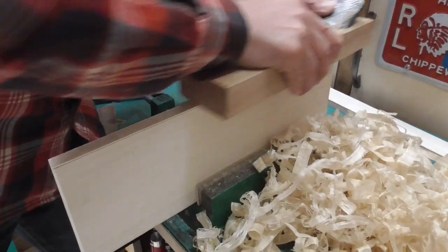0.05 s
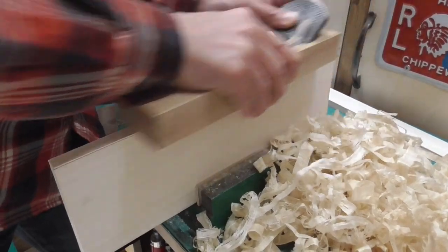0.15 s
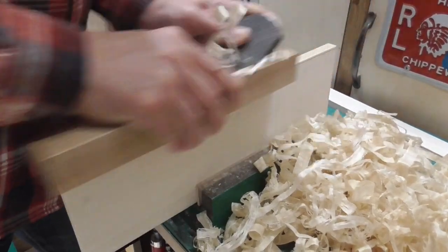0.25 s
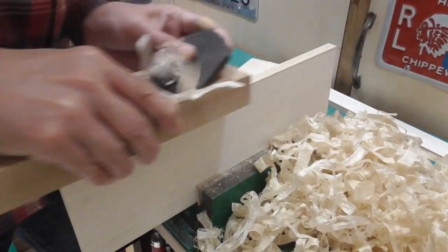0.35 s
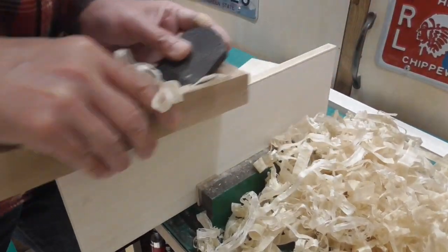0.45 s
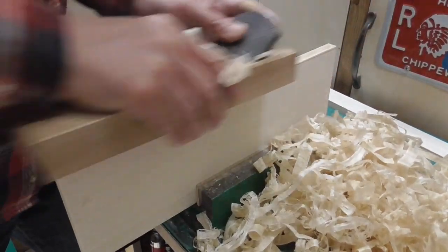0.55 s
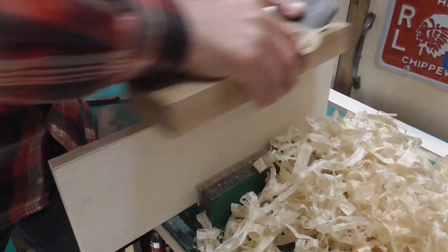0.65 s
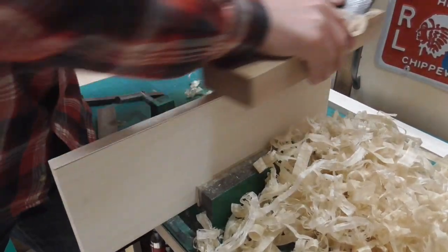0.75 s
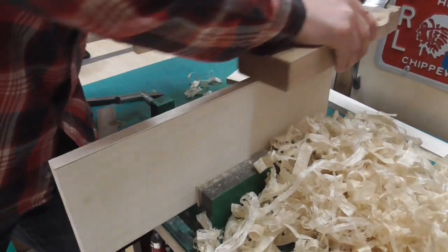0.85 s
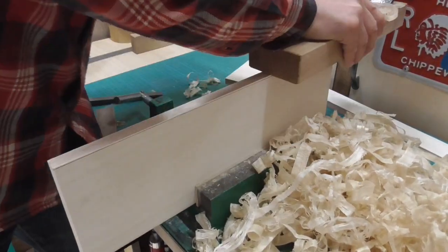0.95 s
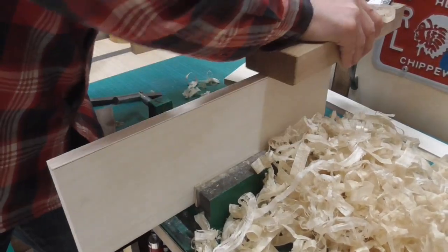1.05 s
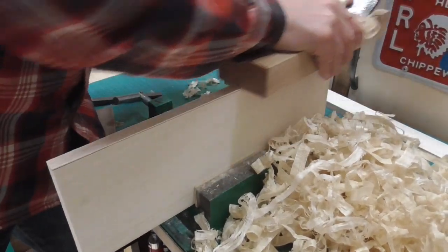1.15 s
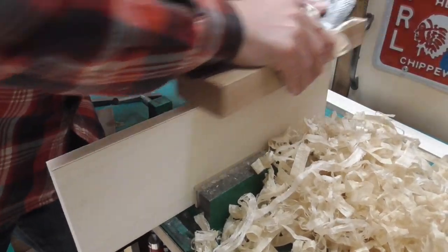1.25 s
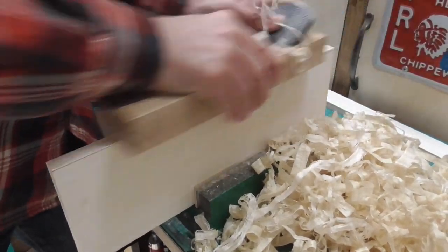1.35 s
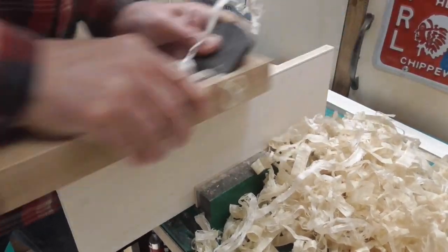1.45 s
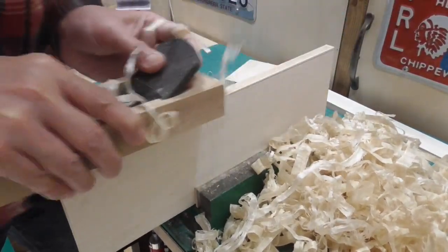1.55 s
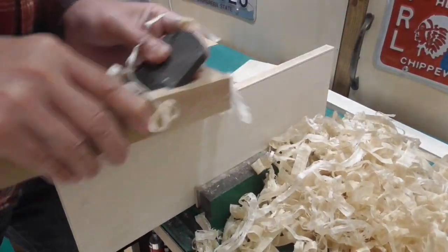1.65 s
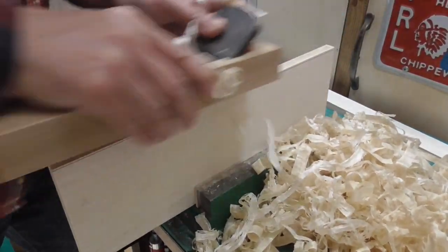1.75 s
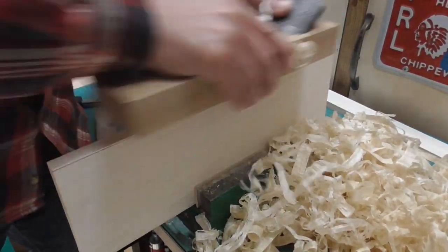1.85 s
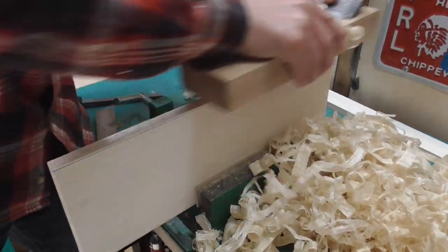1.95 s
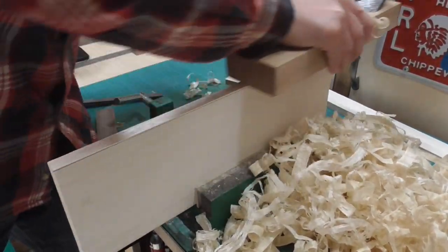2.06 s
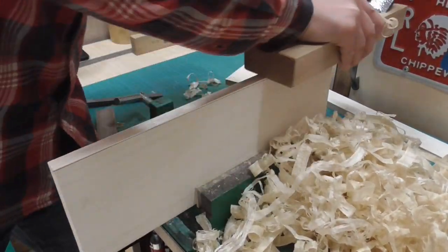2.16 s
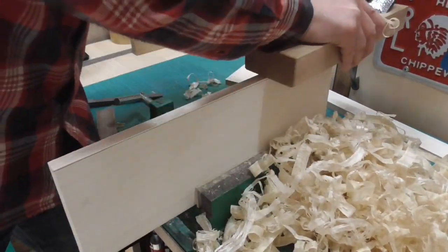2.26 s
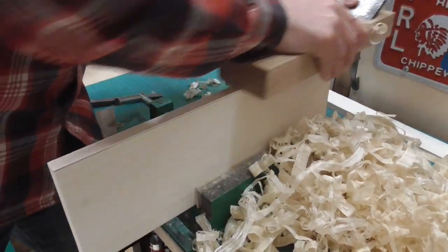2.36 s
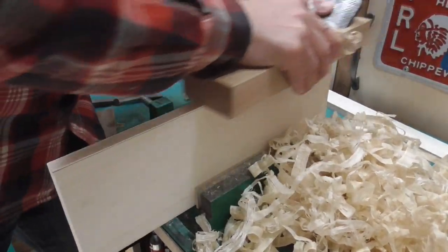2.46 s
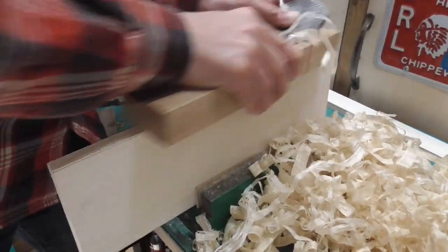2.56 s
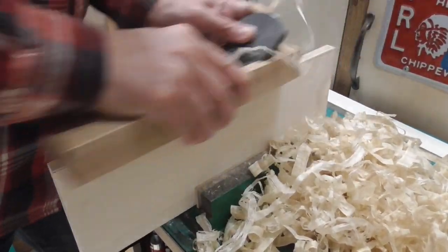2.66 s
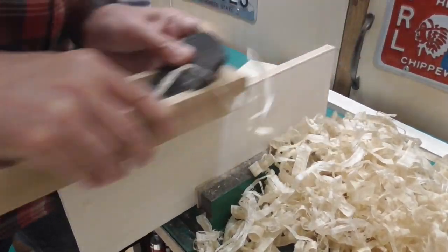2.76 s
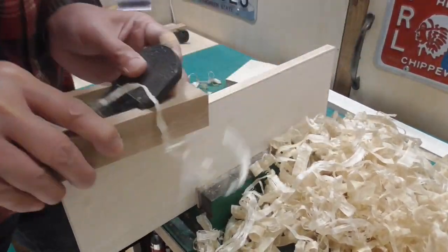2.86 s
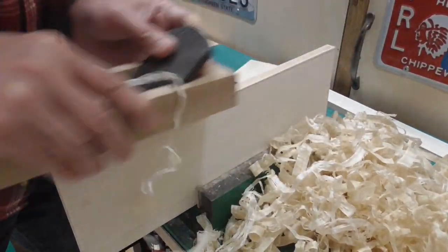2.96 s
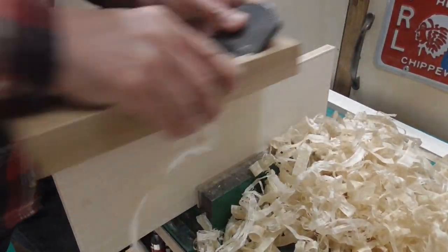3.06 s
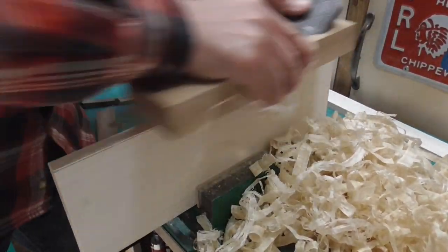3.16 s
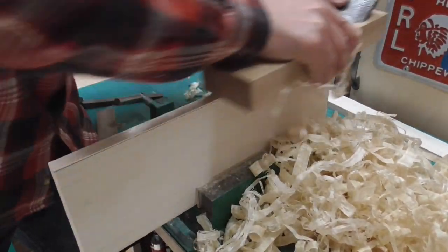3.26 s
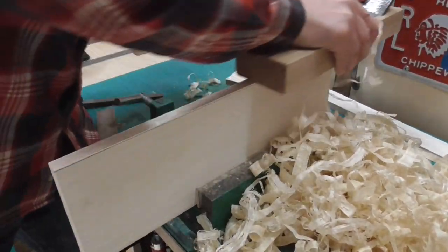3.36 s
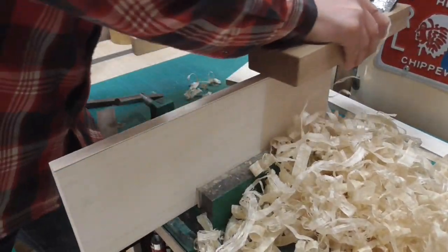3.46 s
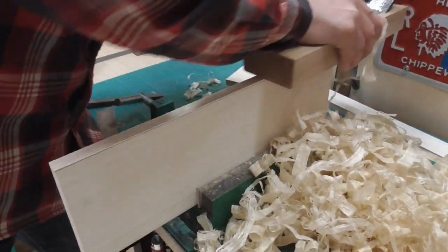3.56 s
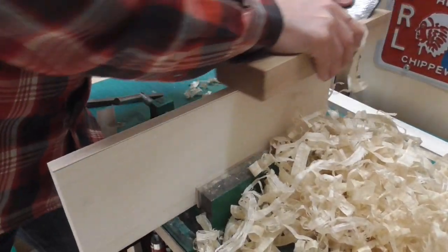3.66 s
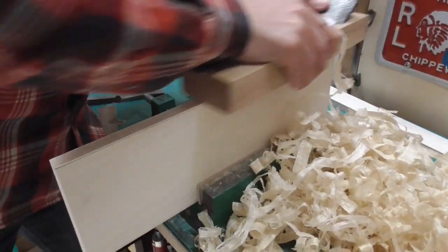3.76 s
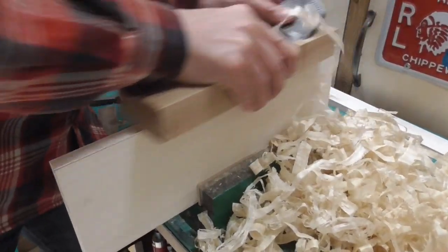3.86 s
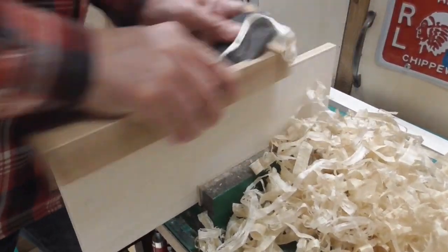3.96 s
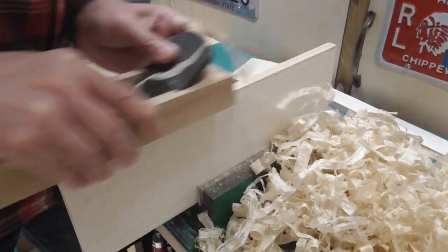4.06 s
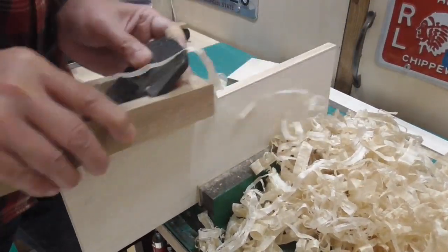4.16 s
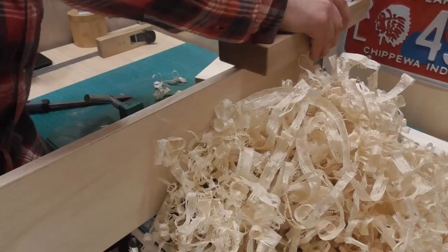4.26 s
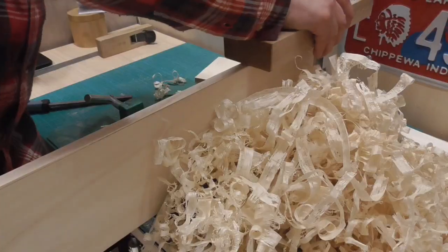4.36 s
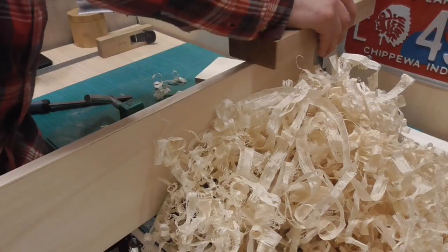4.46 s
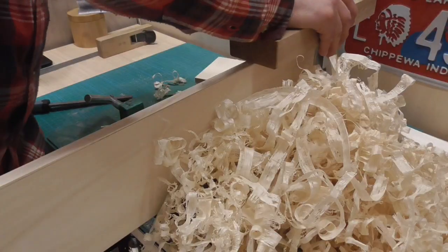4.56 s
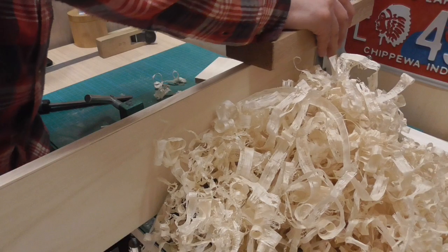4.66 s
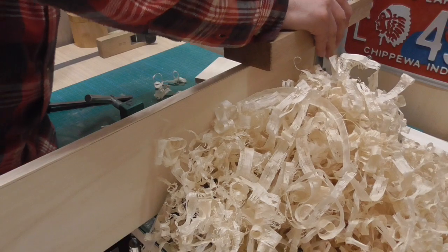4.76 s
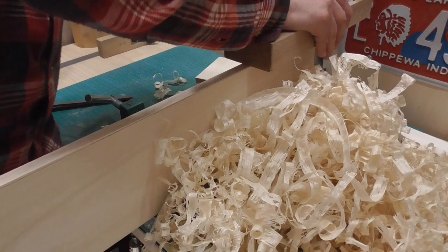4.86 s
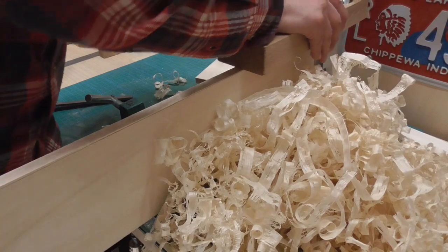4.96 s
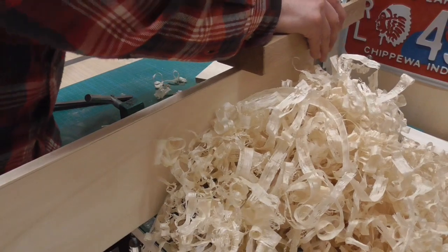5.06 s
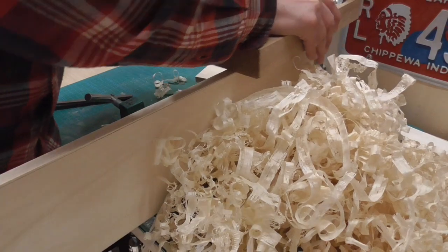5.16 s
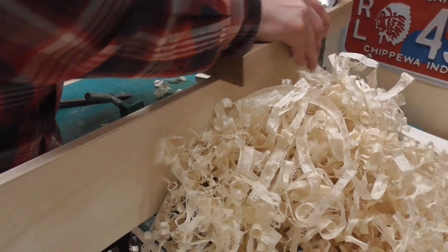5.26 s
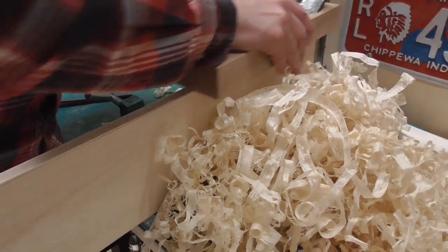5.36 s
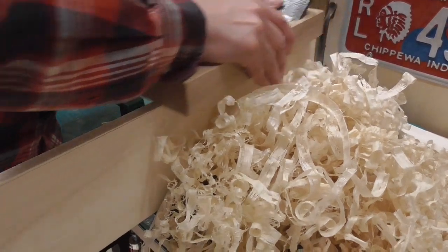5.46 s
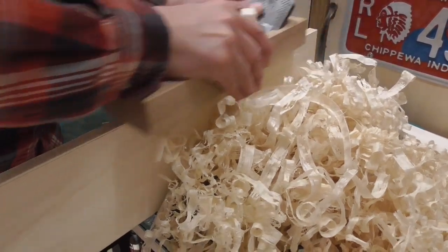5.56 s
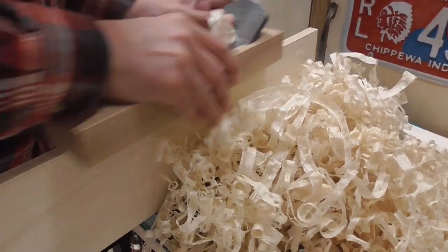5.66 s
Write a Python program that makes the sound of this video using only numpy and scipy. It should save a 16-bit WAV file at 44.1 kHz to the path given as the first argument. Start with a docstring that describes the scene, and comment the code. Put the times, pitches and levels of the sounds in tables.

```python
"""A tearing rasp with a bright hiss and short squeals: a hand plane's iron is already cutting the edge of a board.
The plane comes back with a rustle of shavings, knocks down, rubs along on its sole and bites again.
Four strokes on one board, then a slower one on a second board, in a small quiet workshop.
Cutting is clumped random clicks (breaking fibres) through resonances of board, plane and iron, plus rough
noise tones for tearing and squealing; knocks are bouncing pulses that ring the same boards."""
import sys
import numpy as np
from scipy import signal
from scipy.fft import rfft, irfft, next_fast_len
from scipy.io import wavfile

SR = 44100
rng = np.random.default_rng(int(sys.argv[2]) if len(sys.argv) > 2 else 0)


def log_audio(samples):
    """Write samples as a 16-bit WAV file to the path given in sys.argv[1]."""
    # one column per channel
    frames = np.atleast_2d(samples).T
    # limit to full scale, then quantise
    limited = np.clip(frames, -1, 1)
    pcm = np.round(limited * 32767).astype(np.int16)
    wavfile.write(sys.argv[1], SR, pcm)


N = 251370
TIME = np.arange(N) / SR
# Levels in all tables are relative: each layer's own trims are added on top.


def from_db(db):
    """Decibels to an amplitude factor."""
    return 10 ** (np.asarray(db) / 20)


def rms_one(x):
    """Scale to an rms of 1."""
    return x / np.sqrt(np.mean(x ** 2) + 1e-20)


def stereo(mid, side, width):
    """Left and right share the middle and take the side with opposite signs."""
    return mid + width * side * np.array([[1], [-1]])


def progress(start, end):
    """Share of a movement done, 0 to 1."""
    return np.clip((TIME - start) / (end - start), 0, 1)


def envelope(start, end, attack_s, release_db_per_s):
    """Rises to 1, holds until the end, then dies away."""
    attack = np.clip((TIME - start) / attack_s, 0, 1)
    return attack * from_db(-release_db_per_s * np.maximum(TIME - end, 0))


def drift(rate):
    """Random wander of rms 1: noise smoothed twice at the given rate [Hz]."""
    # made at a tenth of the sample rate; the first 4000 steps let the smoother settle
    r = np.exp(-20 * np.pi * rate / SR)
    noise = rng.standard_normal(N // 10 + 4002)
    slow = signal.lfilter([1], [1, -2 * r, r * r], noise)[4000:]
    return np.interp(np.arange(N) / 10, np.arange(len(slow)), rms_one(slow))


def colour(x, spectrum, size=4096):
    """Causal (minimum-phase) filter that follows a spectrum, interpolated over log frequency."""
    hz, db = np.transpose(spectrum)
    grid = np.maximum(np.arange(size // 2 + 1) * SR / size, 1)
    cepstrum = irfft(np.log(from_db(np.interp(np.log(grid), np.log(hz), db))))
    # folding the cepstrum forward in time gives minimum phase
    cepstrum[1:size // 2] *= 2
    cepstrum[size // 2 + 1:] = 0
    response = irfft(np.exp(rfft(cepstrum)))
    return signal.fftconvolve(np.atleast_2d(x), response[None], axes=1)[:, :N]


def resonate(x, modes, wander_db=0):
    """Parallel resonances; with a wander, each swells and fades as the contact point travels."""
    out = 0
    for hz, width, db in modes:
        r = np.exp(-np.pi * width / SR)
        poles = [1, -2 * r * np.cos(2 * np.pi * hz / SR), r * r]
        gain = from_db(db + wander_db * drift(3.5)) if wander_db else from_db(db)
        out = out + gain * (1 - r * r) / 2 * signal.lfilter([1, 0, -1], poles, x + 1e-18)
    return out


def fibres(per_s, spread_db, clump_db, width):
    """Fibres catch and break as clicks of uneven size, in clumps; width is the part unlike in the two ears."""
    sizes = from_db(spread_db * np.minimum(rng.exponential(1, (2, N)), 4))
    sizes = sizes * rng.choice([-1, 1], (2, N))
    mid, side = sizes * (rng.random((2, N)) < per_s / SR)
    return rms_one(stereo(mid, side, width) * from_db(clump_db * drift(92)))


def rough_tone(hz, half_width_hz, width):
    """A band of noise, rms 1, centred on a moving pitch."""
    turn = np.exp(2j * np.pi * np.cumsum(hz) / SR)
    smoother = signal.butter(2, half_width_hz, fs=SR, output="sos")
    real, imag = signal.sosfilt(smoother, rng.standard_normal((2, 2, N)))
    mid, side = np.real((real + 1j * imag) * turn)
    return rms_one(stereo(mid, side, width))


# Background spectrum of the shop: (frequency [Hz], level [dB])
ROOM_SPECTRUM = [(15, -33), (25, -26.5), (86, -8.5), (146, -9.5), (558, -12), (673, -9.5), (811, -14),
                 (1460, -16.5), (1910, -26), (2070, -21), (2430, -24.5), (5420, -28.5), (5880, -29),
                 (12400, -25), (15000, -31.5)]
ROOM_TONE_DB = -57.5


def room_tone(width=0.64, waver_db=1.5):
    """The quiet, dull background of the shop: coloured noise with a slowly wavering level."""
    mid, side = rng.standard_normal((2, N))
    noise = rms_one(colour(stereo(mid, side, width), ROOM_SPECTRUM))
    return from_db(ROOM_TONE_DB + waver_db * drift(4.9)) * noise


# Strokes of the cutting iron: (bite time [s], exit time [s], attack [s], board level [dB], rasp level [dB],
# hiss level [dB], fade [dB/s], late swell [dB], tearing pitch [Hz], squeal pitch [Hz])
CUT_STROKES = [(0.0, 0.41, 0.022, -28.5, -27.5, -37, 12.5, 7.5, 3200, 4500),
               (1.227, 1.612, 0.016, -28.5, -28, -33, 8, 7.5, 3350, 4557),
               (2.422, 2.885, 0.022, -28.5, -29.5, -32.5, 9, 5.5, 3400, 4500),
               (3.697, 4.125, 0.0092, -29.5, -31.5, -34.5, 8.5, 5, 3150, 4430),
               (5.205, 5.9, 0.073, -33.5, -31.5, -41.5, -5.5, 5, 2950, 4020)]
# Harder grain where the iron bites louder: (time [s], half length [s], level [dB])
HARD_GRAIN_SPOTS = [(0.407, 0.022, 1), (1.273, 0.034, 0.5), (2.49, 0.11, 2.5), (3.768, 0.06, 4.5),
                    (5.247, 0.05, 6), (5.33, 0.03, 4)]
BITE_S = 0.075  # time scale of the iron's first surge
FASTEST_AT, FAST_SPAN = 0.74, 0.31  # where and how broadly the plane runs fastest, as shares of the stroke


def cut_gain(axis, bite_db, swell_share, grain_share, release_db_per_s):
    """Gain of one level column: a surge at the bite, a steady fade or growth, a speed swell, hard grain."""
    gain = 0
    for row in CUT_STROKES:
        bite, end, attack_s, _, _, _, fade, swell_db, _, _ = row
        done = progress(bite, end)
        age = done * (end - bite)
        db = row[axis] + bite_db * np.exp(-(age / BITE_S) ** 2) - fade * age
        db = db + swell_share * swell_db * np.exp(-((done - FASTEST_AT) / FAST_SPAN) ** 2)
        gain = gain + from_db(db) * envelope(bite, end, attack_s, release_db_per_s)
    hardness_db = sum(db * np.sin(np.pi * progress(s - half, s + half)) ** 2
                      for s, half, db in HARD_GRAIN_SPOTS)
    return gain * from_db(grain_share * hardness_db)


def cut_pitch(axis):
    """One pitch column of the cuts, held through each stroke and gliding between strokes."""
    times = [s for row in CUT_STROKES for s in row[:2]]
    return np.interp(TIME, times, np.repeat([row[axis] for row in CUT_STROKES], 2))


# The sole slides without cutting: (start time [s], end time [s], level [dB], rise over the slide [dB],
# hiss level above the rub [dB])
SOLE_SLIDES = [(0.894, 1.05, -45, -1, -1.5), (1.106, 1.215, -51, 16.5, 1), (2.148, 2.266, -46.5, -1, -5.5),
               (2.321, 2.42, -51.5, 14.5, -1.5), (3.375, 3.544, -47, 3, 1), (3.591, 3.683, -51.5, 15.5, 0),
               (4.139, 4.211, -41.5, -10.5, 3.5), (4.227, 4.528, -49.5, 1, -4),
               (4.644, 4.791, -44, -6.5, -4), (4.903, 5.022, -53, 9.5, 0.5), (5.078, 5.234, -43, 8, -4.5)]


def slide_gain(bright=False, arch_db=1.5, attack_s=0.027, release_db_per_s=380):
    """Gain of the sole's rub, or of its hiss: it follows the speed of the push, arched over a rise or fall."""
    gain = 0
    for start, end, db, rise_db, hiss_db in SOLE_SLIDES:
        done = progress(start, end)
        speed_db = rise_db * done + arch_db * (np.sin(np.pi * done) - .5)
        level = from_db(db + speed_db + bright * hiss_db)
        gain = gain + level * envelope(start, end, attack_s, release_db_per_s)
    return gain


# Modes of each board with the plane on it: (frequency [Hz], width [Hz], level [dB])
FIRST_BOARD_MODES = [(146.6, 7.7, -1), (174.7, 8.3, 1), (218.7, 46, -0.5), (245, 9, -14), (357, 28, -10),
                     (399, 17.7, -7.5), (450.4, 46, -6), (488.5, 7, -24.5), (606.6, 29.8, 1.5),
                     (660, 34, -14.5), (688.7, 32, -3.5), (824.3, 17, -1.5), (980, 70, -47),
                     (1097, 79, -9.5), (1268, 50, -9.5), (1364, 33.6, -3), (1580, 43, -13.5),
                     (2060, 110, -4), (2428, 135, 4), (2732, 65, 1), (3360, 83, 9), (3730, 270, 2),
                     (4180, 160, -2), (4540, 184, 6.5)]
SECOND_BOARD_MODES = [(71.6, 20, -19), (114, 70, -3.5), (171, 6.9, 4.5), (225, 15, 3), (344.6, 14.4, -1),
                      (401, 38, 0.5), (459, 7.9, -5.5), (592, 39, -10), (723, 24.3, -4), (820, 75, -8),
                      (958, 15, 0), (1180, 190, -24), (1554, 37, -9.5), (2068, 31, 8.5), (2390, 220, 2.5),
                      (2820, 290, -1.5), (3200, 280, 7), (3670, 145, 9), (3870, 78, 15.5), (4400, 200, -27)]
BOARD_CHANGE_S, BOARD_TOP_HZ = 4.21, 1800


def low(modes):
    """The bending modes of the board."""
    return [m for m in modes if m[0] < BOARD_TOP_HZ]


def high(modes):
    """The upper modes, mostly of the plane's body."""
    return [m for m in modes if m[0] >= BOARD_TOP_HZ]


def boards(force, part):
    """A blow goes into the low or high modes of whichever board is in the vice."""
    first = TIME < BOARD_CHANGE_S
    first_ring = resonate(force * first, part(FIRST_BOARD_MODES))
    return first_ring + resonate(force * ~first, part(SECOND_BOARD_MODES))


def per_board(first, second):
    """Steady sound, each version scaled to rms 1, from whichever board is in the vice."""
    return np.where(TIME < BOARD_CHANGE_S, rms_one(first), rms_one(second))


# Spectrum of the rubbing force: (frequency [Hz], level [dB])
RUB_SPECTRUM = [(30, -31.5), (130, -11), (220, -7), (420, -8.5), (600, 1.5), (1000, -1), (1400, 2),
                (1900, -9.5), (3000, -1), (6000, -25)]


def board_drone(cut_db=0.0, slide_db=1.5, wander_db=1.8, direct_db=-19):
    """Cutting and sliding both shake the board's modes."""
    force = colour(fibres(per_s=5000, spread_db=2.0, clump_db=1.5, width=0.1), RUB_SPECTRUM)
    direct = from_db(direct_db) * force
    first = resonate(force, low(FIRST_BOARD_MODES), wander_db) + direct
    second = resonate(force, low(SECOND_BOARD_MODES), wander_db) + direct
    cut = cut_gain(axis=3, bite_db=-4.0, swell_share=-0.3, grain_share=1.0, release_db_per_s=328)
    return per_board(first, second) * (from_db(cut_db) * cut + from_db(slide_db) * slide_gain())


# Spectrum of the tearing fibres on each board: (frequency [Hz], level [dB])
FIRST_RASP_SPECTRUM = [(1000, -6.5), (1700, -24), (2500, 4.5), (3100, -31.5), (3700, 13), (4500, -7),
                       (5300, -10), (6200, -7), (7500, -41.5)]
SECOND_RASP_SPECTRUM = [(1000, -12.5), (1800, -7), (2300, -14), (2800, -1), (3900, -3), (4700, -4.5),
                        (5400, -23), (6200, -14), (7500, -22)]
TEAR_RISE_HZ, TEAR_WANDER_HZ = 647.5, 150  # the tearing pitch rises in mid-stroke and wanders with the grain


def rasp(cut_db=0.0, slide_db=-4.5, ring_db=-1.0, direct_db=-3.5, tear_db=-8.5, wander_db=1.0):
    """Tearing fibres sound directly, through the plane's modes and in a broad resonance that moves."""
    force = fibres(per_s=7600, spread_db=1.5, clump_db=0.1, width=0.34)
    direct = per_board(colour(force, FIRST_RASP_SPECTRUM), colour(force, SECOND_RASP_SPECTRUM))
    shake = fibres(per_s=6000, spread_db=4.5, clump_db=1.5, width=0.063)
    ring = per_board(resonate(shake, high(FIRST_BOARD_MODES), wander_db),
                     resonate(shake, high(SECOND_BOARD_MODES), wander_db))
    cut = cut_gain(axis=4, bite_db=0.5, swell_share=-0.41, grain_share=0.69, release_db_per_s=560)
    mid_stroke = sum(np.sin(np.pi * progress(bite, end)) ** 2 for bite, end, *_ in CUT_STROKES)
    tear_hz = cut_pitch(axis=8) + TEAR_RISE_HZ * mid_stroke + TEAR_WANDER_HZ * drift(5)
    tear = from_db(tear_db) * cut * rough_tone(tear_hz, half_width_hz=540, width=0.2)
    gain = from_db(cut_db) * cut + from_db(slide_db) * slide_gain()
    return gain * (from_db(direct_db) * direct + from_db(ring_db) * ring) + tear


# Spectrum of the finest breaks: (frequency [Hz], level [dB])
HISS_SPECTRUM = [(5000, -18.5), (6500, -12), (7100, -7), (7650, -5), (8300, -3), (8900, 0), (9700, -3),
                 (10800, -5), (12200, -8.5), (13700, -12), (15300, -22)]
# Ring of the iron's edge: (frequency [Hz], width [Hz], level [dB])
IRON_MODES = [(7820, 214, 11.5), (8320, 420, 17.5), (8930, 150, -7), (9540, 300, 6), (10550, 1200, -8.5),
              (11780, 500, -1)]
# Broad hiss bands that swell and fade as the shaving curls: (frequency [Hz], width [Hz], level [dB])
SIZZLE_BANDS = [(7460, 800, 6.5), (8870, 750, -11), (9800, 720, -1.5), (11630, 1200, 8.5), (13200, 1200, 4)]


def hiss(cut_db=0.0, slide_db=-7.0, ring_db=-3.0, wander_db=1.0, sizzle_db=-6.0):
    """The finest breaks at the cutting edge make a bright, patchy hiss; the bite sets the iron ringing."""
    grains = fibres(per_s=14000, spread_db=-3.0, clump_db=0.0, width=0.57)
    grains = rms_one(colour(grains, HISS_SPECTRUM))
    iron_force = fibres(per_s=14000, spread_db=-1.0, clump_db=-0.5, width=0.27)
    ring = rms_one(resonate(colour(iron_force, HISS_SPECTRUM), IRON_MODES, wander_db))
    curl_force = fibres(per_s=3500, spread_db=3.5, clump_db=2.5, width=0.7)
    sizzle = rms_one(resonate(colour(curl_force, HISS_SPECTRUM), SIZZLE_BANDS, wander_db=3))
    slide = from_db(slide_db) * slide_gain(bright=True)
    breaking = from_db(cut_db) * cut_gain(axis=5, bite_db=4, swell_share=0.97, grain_share=-0.2,
                                          release_db_per_s=622)
    ringing = cut_gain(axis=5, bite_db=9.5, swell_share=0.7, grain_share=0.1, release_db_per_s=600)
    sizzling = from_db(sizzle_db) * sizzle * breaking
    return grains * (breaking + slide) + sizzling + from_db(ring_db) * ring * (ringing + slide)


# Squeals of the curling shaving: (peak time [s], length [s], level [dB], pitch at the peak [Hz], glide [Hz/s])
SHAVING_SQUEALS = [(0.12, 0.091, -29, 4670, 602), (0.195, 0.069, -25, 4720, -4000),
                   (0.27, 0.13, -22.5, 4400, -800), (1.31, 0.1, -24.5, 4740, 601),
                   (1.385, 0.074, -28.5, 4750, -3000), (1.554, 0.063, -28, 4600, -500),
                   (2.606, 0.073, -21, 4732, -1200), (2.685, 0.053, -21, 4440, -500),
                   (2.785, 0.04, -24.5, 4546, -500), (3.881, 0.083, -23.5, 4780, -1500),
                   (3.944, 0.098, -22.5, 4430, -2000), (5.35, 0.12, -29, 2852, 803.5),
                   (5.442, 0.052, -24, 4010, 502), (5.663, 0.18, -24, 4404, 1800)]


def squeal(db=-2.0, steady_db=-3.5, burst_db=3.5, halo_db=-2.0):
    """The shaving cracks across nearly evenly as it curls: a faint rough tone that breaks into squeals."""
    resting_hz = cut_pitch(axis=9)
    steady = cut_gain(axis=5, bite_db=-1, swell_share=0.5, grain_share=-0.4, release_db_per_s=385)
    steady = steady * rough_tone(resting_hz, half_width_hz=200, width=.2)
    gain, hz = 0, resting_hz
    for s, length, peak_db, peak_hz, glide in SHAVING_SQUEALS:
        gain = gain + from_db(peak_db) * np.sin(np.pi * progress(s - length / 2, s + length / 2))
        hz = np.where(abs(TIME - s) < length / 2, peak_hz + glide * (TIME - s), hz)
    core = rough_tone(hz, half_width_hz=97, width=0.18)
    halo = from_db(halo_db) * rough_tone(hz, half_width_hz=550, width=0.213)
    squeals = gain * rms_one(core * from_db(burst_db * drift(64)) + halo)
    return from_db(db) * squeals + from_db(steady_db) * steady


def catches(per_s, decay_s, depth):
    """The iron catches in the grain: sudden surges that die away; a gain of rms 1."""
    jolts = (rng.random(N) < per_s / SR) * rng.uniform(.3, 1, N)
    surges = signal.lfilter([1], [1, -np.exp(-1 / (decay_s * SR))], jolts + 1e-18)
    return rms_one(1 + depth * surges)


# The plane is carried back, shavings rustling: (start time [s], end time [s], level [dB], fade [dB/s])
CARRIES_BACK = [(0.434, 0.88, -62, 51), (1.675, 1.8, -60.5, 112), (1.91, 2.117, -62.5, 47),
                (2.954, 3.28, -66.5, 8)]
# Shavings snapping: (time [s], level [dB])
SHAVING_SNAPS = [(1.703, -42), (1.7358, -45), (1.935, -45.5), (3.08, -43), (3.1892, -44), (3.2425, -48)]
# Spectrum of crinkling shavings, also of crushed wood: (frequency [Hz], level [dB])
RUSTLE_SPECTRUM = [(700, 8.5), (2000, -20), (4200, 6), (6200, -10), (8300, 7.5), (12000, 5), (15000, -1.5)]


def shavings(rustle_db=7.0, snap_db=-7.5, scratch_db=-8.5, snap_s=0.012, size=4096):
    """Dry curls crinkle against the plane and under its sole; a few snap in short bursts of cracks."""
    crinkle = fibres(per_s=1100, spread_db=4.5, clump_db=2.5, width=.55)
    crinkle = rms_one(colour(crinkle, RUSTLE_SPECTRUM))
    snaps = np.zeros(N)
    decay = np.exp(-np.arange(size) / SR / snap_s)
    for s, db in SHAVING_SNAPS:
        at = round(s * SR)
        snaps[at:at + size] += from_db(db + snap_db) * rng.laplace(0, .5, size) * decay
    carried = 0
    for start, end, db, fade in CARRIES_BACK:
        level = from_db(db - fade * np.maximum(TIME - start, 0))
        carried = carried + level * envelope(start, end, attack_s=0.016, release_db_per_s=200)
    gain = from_db(rustle_db) * carried + from_db(scratch_db) * slide_gain(bright=True)
    return gain * crinkle + colour(snaps, RUSTLE_SPECTRUM)


# The plane knocks and rocks on the edge: (time [s], level [dB], low corner of the blow [Hz],
# high corner of the blow [Hz], gap between bounces [s], loss per bounce [dB])
PLANE_KNOCKS = [(0.895, -22, 170, 770, 0.014, -0.1), (1.2375, -22.5, 170, 300, 0.0145, 18),
                (2.1542, -20, 141, 950, 0.0143, 4), (2.248, -24.5, 150, 420, 0.016, 10),
                (2.263, -25, 91, 234, 0.019, 8.5), (2.431, -33.5, 126.2, 303, 0.015, 29.5),
                (3.015, -43.5, 261, 239, 0.027, 2.5), (3.3404, -10, 376, 790, 0.021, 8),
                (3.573, -36.5, 296.6, 437, 0.015, 17), (3.714, -14, 150, 360, 0.018, 12),
                (4.2414, -29, 130, 1020, 0.016, 10.5), (4.254, -27, 150, 212, 0.014, 5),
                (4.573, -44, 200, 440, 0.015, 22), (4.914, -40, 120, 256, 0.015, 25),
                (5.03, -18, 480, 600, 0.015, 21)]
# A corner of the sole clicks on the edge just before a knock: (time [s], level [dB])
SOLE_SNAGS = [(3.339, -23.5), (5.024, -29)]
SNAG_LOW_HZ, SNAG_HIGH_HZ = 1430, 1890
TOUCHES, BOUNCE_DULLING = 5, 0.86  # touches per knock; share of the high corner kept at each


def blows():
    """Every contact as (s, dB, low Hz, high Hz): knocks bounce, duller each time; snags are single and hard."""
    contacts = []
    for s, db, low_hz, high_hz, gap_s, loss_db in PLANE_KNOCKS:
        for k in range(TOUCHES):
            contacts.append((s + k * gap_s, db - k * loss_db, low_hz, high_hz * BOUNCE_DULLING ** k))
    return contacts + [(s, db, SNAG_LOW_HZ, SNAG_HIGH_HZ) for s, db in SOLE_SNAGS]


# The bench thuds under a knock: (frequency [Hz], width [Hz], level [dB])
BENCH_MODES = [(61, 20, -28.5), (106, 25, -30)]


def knocks(board_db=48, plane_db=32, crack_db=-14, crack_s=0.0071, pulse_db=-2.0,
           rattle=0.056, rattle_s=0.0091, size=4096):
    """Each blow is a soft pulse and a brief rattle as the sole settles on the edge."""
    force, crack, age = np.zeros(N + size), np.zeros(N + size), np.arange(size) / SR
    contacts = blows()
    for (s, db, low_hz, high_hz), chance in zip(contacts, rng.standard_normal((len(contacts), size))):
        blow = from_db(pulse_db) * (age == 0) + rattle * chance * np.exp(-age / rattle_s)
        contact = np.vstack([signal.butter(1, low_hz, "high", fs=SR, output="sos"),
                             signal.butter(2, high_hz, fs=SR, output="sos")])
        at = round(s * SR)
        force[at:at + size] += from_db(db) * signal.sosfilt(contact, blow)
        # the harder the contact, the louder the crack of crushed wood
        crack_gain = from_db(db + crack_db) * (high_hz / BOARD_TOP_HZ) ** 2
        crack[at:at + size] += crack_gain * chance * np.exp(-age / crack_s)
    force, crack = force[:N], crack[:N]
    thud = boards(force, low) + resonate(force, BENCH_MODES)
    plane = boards(force, high)
    return from_db(board_db) * thud + from_db(plane_db) * plane + colour(crack, RUSTLE_SPECTRUM)


SHOP_T60_S = 0.1


def workshop(x, wet_db=-12, first_echo_s=0.00502, size=16384):
    """Bench and near walls return a short dense tail, different at each ear."""
    age = np.arange(size) / SR
    tail = rng.standard_normal((2, size)) * from_db(-60 * age / SHOP_T60_S) * (age > first_echo_s)
    tail /= np.sqrt(np.sum(tail ** 2, axis=1, keepdims=True))
    return x + from_db(wet_db) * signal.fftconvolve(x, tail, axes=1)[:, :N]


def scene(grain_db=0.57):
    """The grain of the wood makes the whole stroke flutter together."""
    cutting = (rasp() + hiss() + squeal()) * catches(per_s=70, decay_s=0.008, depth=0.35)
    stroke = (board_drone() + cutting) * from_db(grain_db * drift(8))
    return workshop(stroke + shavings() + knocks()) + room_tone()


# Level balance of the microphone pair: (frequency [Hz], left minus right [dB])
MIC_LEAN = [(60, -2), (99, -1), (160, -2), (270, -4.5), (450, 2), (740, -3.5), (1220, -1.5), (2010, -1),
            (3330, -0.5), (5500, 0), (9080, -1.5), (15000, -7.5)]
# Phase of the microphone pair: (frequency [Hz], lead of the left [rad])
MIC_LEAD = [(30, 0), (800, 0.45), (1250, 1), (1700, 0.77), (4900, 0.0), (5500, 1.07), (6460, 3.1),
            (7000, 6), (9650, 7), (11400, 7.5), (13000, 8.5), (15200, 7)]
CUTOFF_HZ = 15300


def record(dry):
    """The two microphones differ in level and phase; the top is cut."""
    size = next_fast_len(N + 4096, True)
    log_hz = np.log(np.maximum(np.fft.rfftfreq(size, 1 / SR), 1))
    lean_hz, lean_points = np.transpose(MIC_LEAN)
    lead_hz, lead_points = np.transpose(MIC_LEAD)
    lean_db = np.interp(log_hz, np.log(lean_hz), lean_points)
    lead = np.interp(log_hz, np.log(lead_hz), lead_points)
    half = np.array([[.5], [-.5]])  # each side takes half the difference
    pair = from_db(half * lean_db) * np.exp(1j * half * lead)
    heard = irfft(rfft(dry, size) * pair, size)[:, :N]
    return signal.sosfilt(signal.ellip(10, .1, 90, CUTOFF_HZ, fs=SR, output="sos"), heard)


dry = scene()
out = record(dry)
log_audio(out)
```